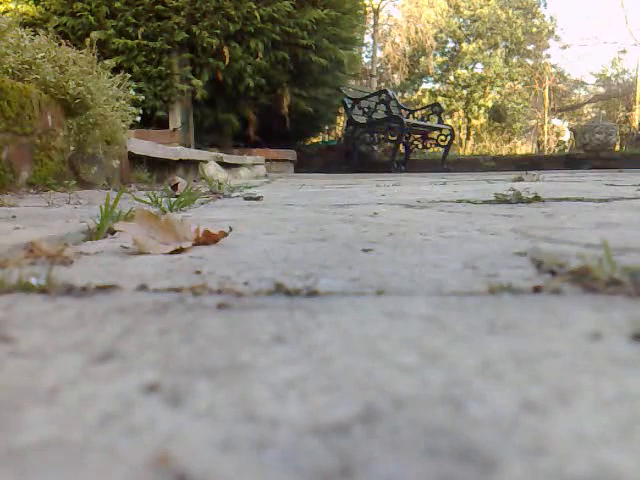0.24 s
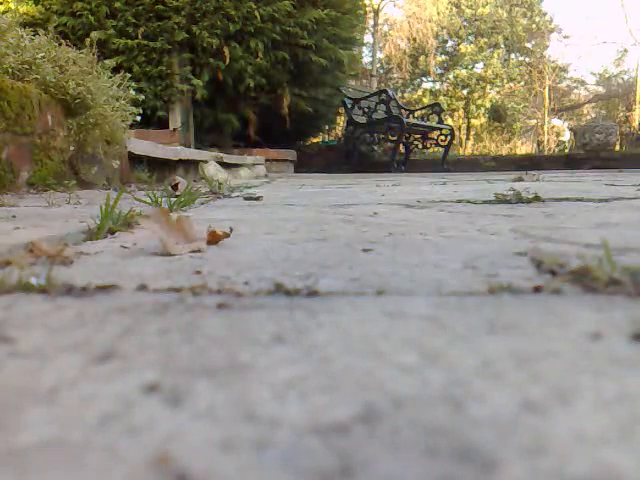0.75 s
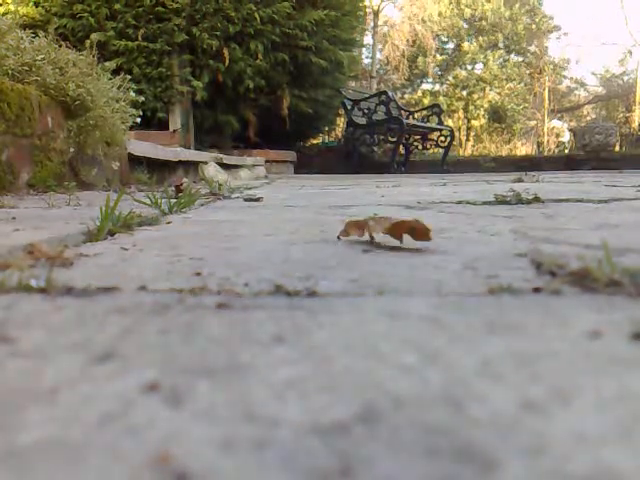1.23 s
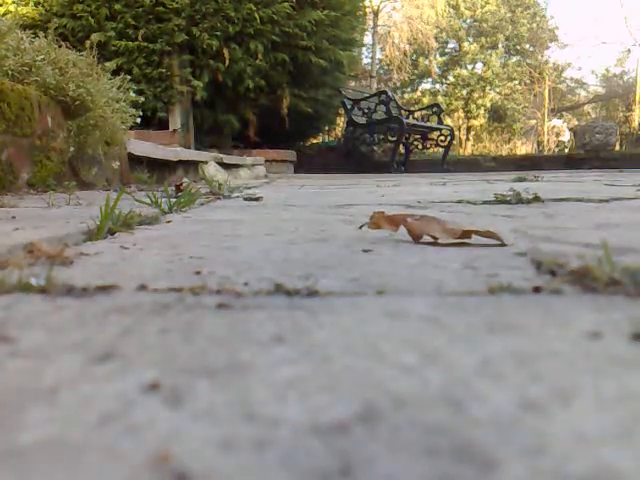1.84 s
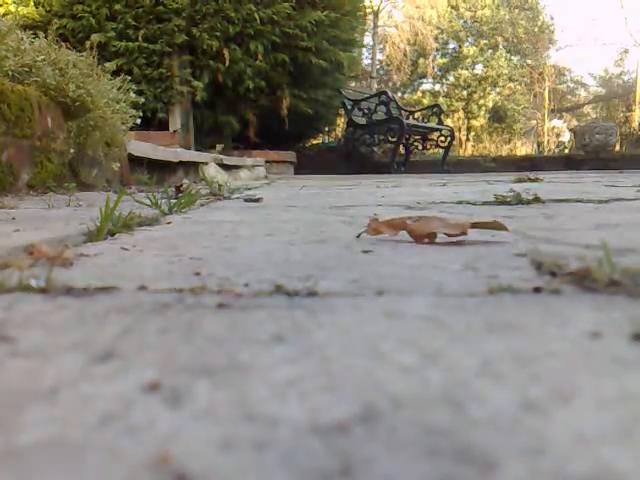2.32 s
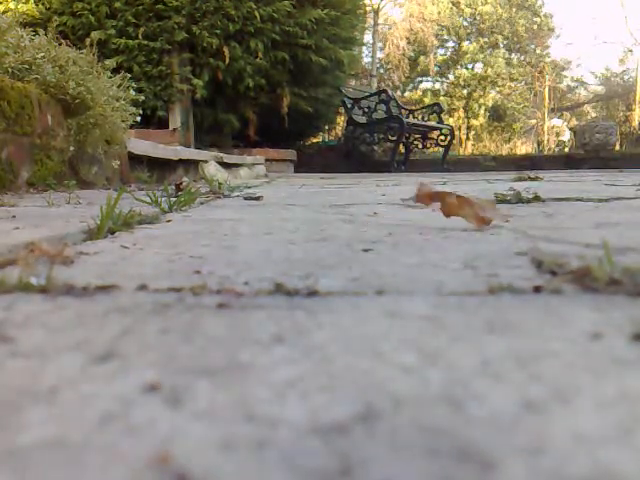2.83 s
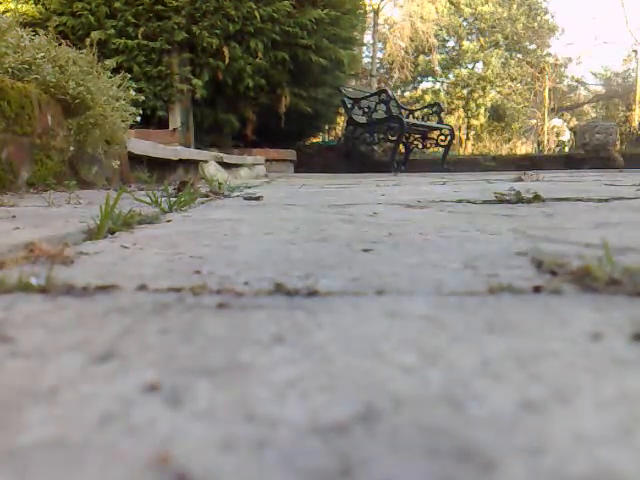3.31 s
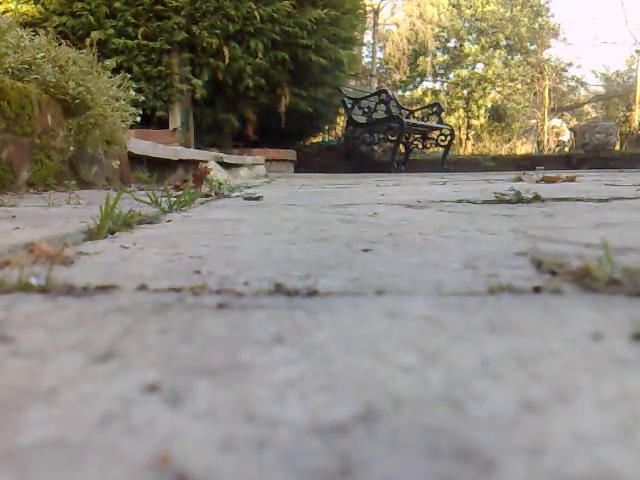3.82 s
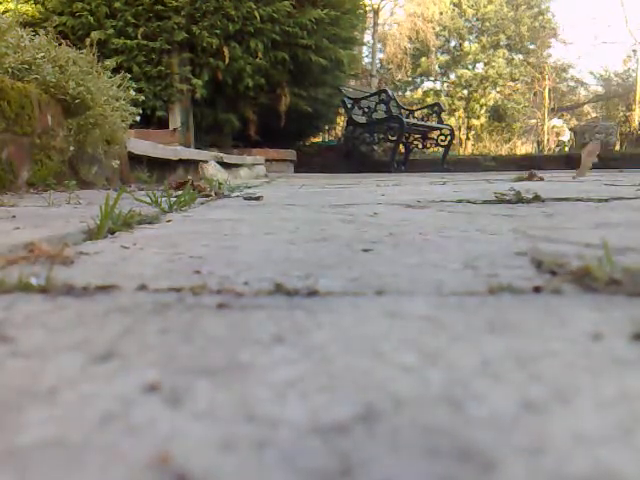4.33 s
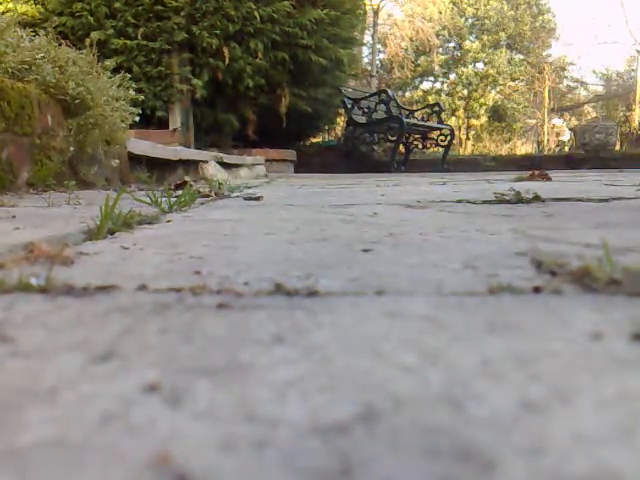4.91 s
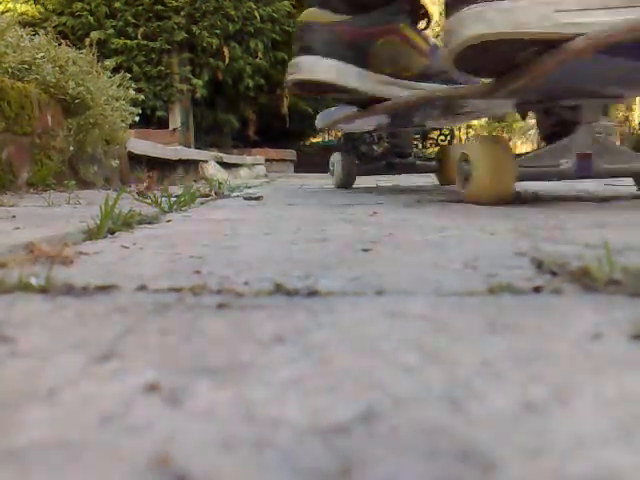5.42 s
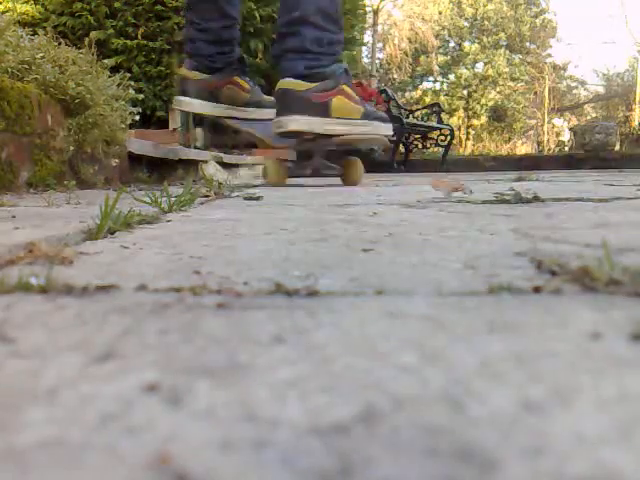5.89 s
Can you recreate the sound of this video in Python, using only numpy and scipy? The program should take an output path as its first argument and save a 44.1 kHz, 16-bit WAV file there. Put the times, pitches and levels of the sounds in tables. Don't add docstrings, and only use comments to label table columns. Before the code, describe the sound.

Skateboard clatters, scrapes and knocks on rough paving slabs, pauses, then rolls loudly past a ground-level microphone in a gusty, quiet garden.

```python
import sys
import numpy as np
from scipy import signal
from scipy.fft import rfft, irfft, next_fast_len
from scipy.io import wavfile
from scipy.ndimage import uniform_filter1d, map_coordinates

SR = 44100
rng = np.random.default_rng(int(sys.argv[2]) if len(sys.argv) > 2 else 0)


def unload_audio(sound):
    columns = np.transpose(np.atleast_2d(sound))
    steps = np.round(np.clip(columns, -1, 1) * 32767)
    wavfile.write(sys.argv[1], SR, steps.astype(np.int16))


def volts(x):
    e = np.asarray(x, float) / 20
    return 10 ** e


N = 271215


def unit(x):
    return x / np.sqrt(np.mean(x ** 2) + 1e-20)


def along(points, hz):
    f, v = np.transpose(points)
    return np.interp(np.log(hz + 1), np.log(f + 1), v)


def curves(rows):
    s, *cols = np.transpose(rows)
    return [np.interp(np.arange(N) / SR, s, c) for c in cols]


def wobble(rate_hz, span=slice(None)):
    knots = rng.standard_normal(int(N * rate_hz / SR) + 4)
    return map_coordinates(knots, [np.arange(N)[span] * rate_hz / SR])


def filtered(x, response):
    m = next_fast_len(N + SR // 2)
    return irfft(rfft(x, m) * response(np.fft.rfftfreq(m, 1 / SR)), m)[..., :N]


def body(modes, skirt):
    lo, hi = modes[0][0] / skirt, modes[-1][0] * skirt

    def raw(f):
        peaks = 0
        for k, (hz, width, db) in enumerate(modes):
            mode = 1j * f * width / (hz * hz - f * f + 1j * f * width)
            peaks = peaks + (-1) ** k * volts(db) * mode
        band = 1j * f / lo / (1 + 1j * f / lo) / (1 + 1j * f / hi)
        return peaks * band ** 2

    norm = np.sqrt(np.mean(abs(raw(np.linspace(0, SR / 2, 1 << 13))) ** 2))
    return lambda f: raw(f) / norm


# (frequency [Hz], density [dB per Hz])
GARDEN_SPECTRUM = [(15, -57), (25, 5.5), (87, -81), (123, 5), (149, -12.5), (3250, -28.5), (7500, -43.5),
                   (16000, -47)]


def garden():
    noise = filtered(rng.standard_normal(N), lambda hz: volts(along(GARDEN_SPECTRUM, hz)))
    return volts(-52.5) * volts(1.2 * wobble(6)) * unit(noise)


def glides(rows, width_hz, steady):
    out = np.zeros(N)
    for start_s, end_s, db, hz0, hz1 in rows:
        span = slice(round(start_s * SR), round(end_s * SR))
        way = np.linspace(0, 1, span.stop - span.start)
        phase = 2 * np.pi * np.cumsum(hz0 + (hz1 - hz0) * way) / SR
        tone = (steady + wobble(width_hz, span)) * np.sin(phase) + wobble(width_hz, span) * np.cos(phase)
        out[span] += volts(db) * np.sqrt(abs(np.sin(np.pi * way))) * tone
    return out


# (start [s], end [s], level [dB], first pitch [Hz], last pitch [Hz])
CHIRP_EVENTS = [
    (0.453, 0.853, -66.5, 3240, 3100),
    (3.874, 3.904, -58, 7250, 7200),
    (3.934, 3.958, -59.5, 7760, 7750),
]


def chirps():
    return glides(CHIRP_EVENTS, width_hz=63, steady=1.1)


# (frequency [Hz], t60 [s])
YARD_T60 = [(300, 0.27), (15000, 0.059)]


def yard(x):
    hz, t, z = signal.stft(rng.standard_normal(SR // 3), SR, nperseg=256)
    decay = volts(-60 * t / along(YARD_T60, hz)[:, None])
    tail = signal.istft(z * decay, SR, nperseg=256)[1]
    delay_samples = 300
    return signal.fftconvolve(np.pad(x, (delay_samples, 0)), tail / np.linalg.norm(tail))[:N]


# (frequency [Hz], density [dB per Hz])
BUFFET_SPECTRUM = [(12, -32.5), (50, -1), (90, -1.5), (140, -11), (220, -19), (600, -81)]
# (time [s], strength [dB])
BREEZE_STRENGTH = [(0, -43), (.53, -55.5), (1.37, -48), (1.63, -50), (1.92, -34.5), (2.05, -38),
                   (2.62, -26), (2.74, -45), (3.01, -56.5), (3.2, -36), (3.7, -37.5), (4.08, -50),
                   (4.28, -46), (4.61, -66), (4.75, -37), (5.0, -58.5), (5.25, -41), (6.15, -57)]
# (time [s], peak [dB], time to fall 20 dB [s]
PUFF_EVENTS = [(.01, -39, 0.3), (0.151, -21, 0.03), (.39, -32, 0.1), (1.414, -24, -0.02), (1.99, -38, 0.5),
               (2.09, -7, 0.0253), (2.229, -16, 0.01), (2.789, -24.5, 0), (3.218, -23, 0.15),
               (3.34, -21.5, 0.17), (3.902, -20.5, 0.2151), (4.18, -32.5, -0.06), (4.68, -43, 0.5),
               (5.121, -23.5, 0.25), (6.105, -26, -0.2)]


def wind():
    rise_over_fall, swirl_hz, swirl_gain = 0.6, 54.9, 0.49
    power, swirls = volts(curves(BREEZE_STRENGTH)[0]) ** 2, np.zeros(N)
    for s, db, fall_s in PUFF_EVENTS:
        near = slice(max(round((s - 2 * fall_s) * SR), 0), round((s + 2 * fall_s) * SR))
        t = np.arange(N)[near] / SR - s
        shape = volts(db - 20 * np.maximum(t, -t / rise_over_fall) / fall_s)
        power[near] += shape ** 2
        swirls[near] += shape * np.cos(2 * np.pi * swirl_hz * t)
    eddies = filtered(rng.standard_normal(N), lambda hz: volts(along(BUFFET_SPECTRUM, hz)))
    steady = eddies / abs(uniform_filter1d(eddies ** 2, size=SR // 12)) ** .35
    return np.sqrt(power) * unit(steady) + swirl_gain * swirls


# (start [s], end [s], level [dB], first pitch [Hz], last pitch [Hz])
SQUEAL_EVENTS = [
    (2.279, 2.303, -21, 1608, 1558),
    (2.567, 2.76, -33.5, 6710, 6600),
    (2.63, 2.69, -32.5, 3900, 3900),
    (2.885, 2.96, -38, 2400, 2700),
]


def squeals():
    return glides(SQUEAL_EVENTS, width_hz=570, steady=0)


# (time [s], slip rate [1/s], level [dB])
CREAK_SLIPS = [
    (1.665, 290, -45),
    (1.69, 418, -38),
    (1.76, 393, -38),
    (1.797, 375, -41.5),
    (1.821, 490, -35),
    (1.848, 360, -36),
    (1.88, 250, -42),
    (1.925, 350, -34.5),
    (1.985, 360, -42),
]
# (frequency [Hz], width [Hz], level [dB])
BUSHING_MODES = [(790, 700, -5.5), (1840, 410, 1.5), (2650, 750, -2.5), (3440, 410, 0), (4700, 1300, -14),
                 (6300, 1500, -19)]


def creak():
    rate_hz, level_db = curves(CREAK_SLIPS)
    t = np.arange(N) / SR
    grip = wobble(150)
    turns = np.cumsum(rate_hz * (1 + .03 * grip)) / SR
    slips = np.diff(np.floor(turns), prepend=0) * volts(1.3 * rng.standard_normal(N))
    drive = unit(slips) + .35 * rng.standard_normal(N)
    sounding = (t > CREAK_SLIPS[0][0]) & (t < CREAK_SLIPS[-1][0])
    return filtered(volts(level_db + 2 * grip) * sounding * drive, body(BUSHING_MODES, skirt=3.4))


# (start [s], end [s], level [dB], first centre [Hz], last centre [Hz])
SCUFF_EVENTS = [
    (2.468, 2.535, -25.5, 6500, 3980),
    (3.701, 3.727, -36.5, 6900, 8900),
    (3.815, 3.844, -47, 3500, 4500),
    (3.898, 3.916, -54, 4000, 4000),
    (4.041, 4.063, -40.5, 3920, 6900),
    (4.272, 4.292, -55, 4998, 6000),
    (4.319, 4.341, -51.5, 3920, 4970),
    (4.414, 4.425, -50, 6000, 6500),
    (5.017, 5.054, -13.5, 6700, 3250),
]
# (start [s], end [s], level [dB], first centre [Hz], last centre [Hz])
SWISH_EVENTS = [
    (2.877, 2.967, -35.5, 3600, 4170),
]


def scuffs():
    octaves, attack_s = 1, 0.00145
    hz, t, z = signal.stft(rng.standard_normal(N), SR, nperseg=128)
    gain = np.zeros(z.shape)
    for rows, swells in [(SCUFF_EVENTS, False), (SWISH_EVENTS, True)]:
        for s0, s1, db, hz0, hz1 in rows:
            centre_hz = np.interp(t, [s0, s1], [hz0, hz1])
            band = np.exp(-.5 * (np.log2((hz[:, None] + 1) / centre_hz) / octaves) ** 2)
            if swells:
                envelope = np.sin(np.pi * np.clip((t - s0) / (s1 - s0), 0, 1)) ** 2
            else:
                release_s = 0.11 * (s1 - s0)
                envelope = np.clip(np.minimum((t - s0) / attack_s, (s1 - t) / release_s), 0, 1)
            even = np.sqrt(np.mean(band ** 2) / np.mean(band ** 2, 0))
            gain += volts(db) * envelope * unit(band.T).T * even
    grain = volts(2 * wobble(120))
    return grain * signal.istft(z * gain, SR, nperseg=128)[1][:N]


def knocks(rows, trim_db, cycles):
    overtone_ratio, overtone_db = 1.796, -11
    t, out = np.arange(SR // 12) / SR, np.zeros(N + SR)
    for s, db, hz in rows:
        fade = np.exp(-2 * hz * t / cycles) * (1 - np.exp(-3 * hz * t))
        overtone_hz = min(overtone_ratio * hz, SR / 3)
        tone = np.sin(2 * np.pi * hz * t) + volts(overtone_db) * np.sin(2 * np.pi * overtone_hz * t)
        out[round(s * SR):][:len(t)] -= volts(db + trim_db) * fade / fade.max() * tone
    return out[:N]


# (time [s], peak [dB], note [Hz])
SPECK_EVENTS = [(.0074, -23, 11900), (.04, -24, 5500), (.0594, -25, 6000), (.1144, -32, 3740),
                (1.22, -19, 11000), (1.274, -24, 3820), (1.307, -21.5, 9000), (1.35, -8.5, 6900),
                (1.4336, -11, 10800), (1.5517, -15.5, 11400), (2.126, -8, 3930), (2.371, -18, 3520),
                (2.804, -15, 9300), (2.8274, -30.5, 4990), (2.9053, -20, 6010), (3.046, -10, 1544),
                (3.088, -25, 4480), (3.1034, -27, 8000), (3.1577, -31, 9000), (3.257, -22, 9000),
                (3.2854, -24, 10870), (3.2954, -23, 6420), (3.308, -15, 11600), (3.399, -14, 9000),
                (3.4441, -28, 11100), (3.8208, -34, 7210), (4.1729, -37, 5000), (5.016, -22, 4970)]


def specks():
    return knocks(SPECK_EVENTS, trim_db=1.5, cycles=1.5)


# (time [s], peak [dB], note [Hz])
RIDDEN_STONES = [(5.016, -13, 726), (5.042, -19, 610), (5.067, -23, 649), (5.104, -16, 755),
                 (5.112, -10, 720), (5.139, -5, 720), (5.157, -16, 576), (5.189, -22, 750),
                 (5.206, -16, 638), (5.216, -13, 700), (5.28, -14, 765), (5.299, -12, 726),
                 (5.328, -16, 600), (5.352, -21, 710), (5.379, -15, 730), (5.405, -11, 750),
                 (5.419, -7, 730), (5.696, -18, 550), (5.779, -19, 637), (5.824, -19, 790),
                 (5.886, -24, 555), (5.947, -21, 805), (5.972, -7, 784), (6.001, -23, 1210),
                 (6.03, -5, 540)]
# (time [s], peak [dB], note [Hz])
HIGHER_STONES = [(5.1246, -5, 1440), (5.4905, -15, 1430), (5.5066, -19, 1340), (5.5345, 1, 1770),
                 (5.5423, 0, 1300), (5.5575, -9.5, 1080), (5.5775, -7, 1244), (5.6056, -11.5, 1440),
                 (5.6143, -5, 1390), (5.6244, -6, 1280), (5.634, -14, 1260), (5.666, -12, 1350),
                 (5.7222, -8, 990), (5.7365, -14, 1360), (5.8653, -16.5, 1000), (5.886, -21, 1230),
                 (5.917, -9, 1220), (5.9436, -22, 1200), (5.9743, -24, 1370), (5.982, -21, 1124),
                 (5.9935, -20, 1400), (6.007, -22, 1220), (6.0166, -14, 1520), (6.0346, -14, 1420),
                 (6.0425, -10, 1500), (6.046, -10.5, 997), (6.0607, -17, 1320), (6.067, -14, 1790),
                 (2.203, -20, 1720), (2.217, -20, 1770), (1.424, -13, 1090), (.776, -33, 2900),
                 (5.552, -3, 2860)]
# (time [s], peak [dB], note [Hz])
PUSHED_STONES = [(0.024, -13, 400), (0.236, -27, 348), (0.312, -34, 302), (0.339, -24, 520),
                 (1.147, -33, 969), (1.169, -22.5, 626), (1.221, -12, 837), (1.275, -22, 900),
                 (1.305, -10, 1025), (1.314, -17, 764), (1.428, -9, 530), (1.507, -15, 520),
                 (1.608, -31, 595), (1.845, -23, 333), (2.113, -19, 720), (2.134, -16.5, 590),
                 (2.333, -13, 562), (2.341, -18, 344), (2.417, -12, 330), (2.475, -2.5, 716),
                 (2.494, -15, 410), (2.519, -7, 617), (2.574, -0.5, 630), (2.665, -15.5, 330),
                 (2.694, -13.5, 720), (2.753, -11.5, 600), (2.794, -7.5, 339), (3.215, -10.5, 356),
                 (3.3155, -5.5, 280), (3.284, -22, 630), (3.394, -21, 347), (4.393, -33, 304)]


def stone_knocks():
    return knocks(RIDDEN_STONES + HIGHER_STONES + PUSHED_STONES, trim_db=-3.5, cycles=3.4)


# (time [s], peak [dB], note [Hz])
DIP_EVENTS = [(.365, -22, 188), (.394, -8.5, 203), (1.407, -6, 154), (2.088, -16.5, 59.5),
              (2.216, -10, 129.7), (2.372, -2, 184), (2.386, -12, 183), (2.468, -4, 195), (2.492, -5, 191),
              (2.611, -5.5, 149), (3.204, -13, 88), (3.65, -20, 91), (5.232, -8, 121), (5.38, -12.5, 200),
              (5.404, -11, 220), (5.464, -11, 148), (5.531, -14, 170), (6.085, -14.5, 66),
              (6.115, -17, 90.3)]


def dips():
    return knocks(DIP_EVENTS, trim_db=-1.0, cycles=1.34)


# (frequency [Hz], width [Hz], level [dB])
DECK_LOW_MODES = [(131.5, 99, -7), (197.4, 62.6, 0.5), (324, 220, -3.5)]
# (frequency [Hz], width [Hz], level [dB])
DECK_MODES = [(530, 95, -2), (720, 111, -3), (953, 153, -4.5), (1354, 152, -4.5), (1715, 180, -4.5),
              (2193, 320, -11.5)]
# (frequency [Hz], width [Hz], level [dB])
AXLE_MODES = [(2390, 650, 7), (3900, 1070, 7), (4590, 1300, 5), (6500, 1800, -1.5)]
# (frequency [Hz], width [Hz], level [dB])
GRIT_MODES = [(7690, 5400, -30), (10800, 6550, 26), (13540, 3700, 21), (16400, 1500, -15)]


def parts():
    return [body(DECK_LOW_MODES, skirt=1.69), body(DECK_MODES, skirt=2.03),
            body(AXLE_MODES, skirt=5.5), body(GRIT_MODES, skirt=7.5)]


# (time [s], peak [dB])
NUDGED_SAND = [(.0024, -27), (0.0158, -22), (0.029, -7.5), (0.0793, -13), (.174, -26), (1.1833, -17.5),
               (1.2507, -15), (1.3708, -15), (1.411, -8), (1.4226, -3), (1.477, -9), (1.4856, -5),
               (1.506, -8), (1.527, -7), (1.54, -1.5), (1.56, -13.5), (1.5886, -21), (1.664, -15.5),
               (1.7291, -7.5), (2.0534, -12), (2.0976, -1), (2.175, -20), (2.189, -4), (2.2719, -4.5)]
# (time [s], peak [dB])
ROLLED_SAND = [(2.308, -12), (2.407, -8), (2.455, 1.5), (2.5685, -3.5), (2.6523, -1.14), (2.6777, 8),
               (2.721, -8), (3.0473, -20), (3.116, -6), (3.2728, -7.5), (3.3752, -14), (3.3896, -5),
               (3.479, -17), (3.6689, -16.5), (3.713, -18), (3.842, -25.5), (5.918, -12), (5.1473, 6.5),
               (5.1846, -10), (5.245, -4), (5.259, 1), (5.2778, -1), (5.362, 0.5), (6.113, -19)]
# (time [s], peak [dB], pitch [Hz])
PEBBLE_GRAINS = [
    (0.364, -31, 4440),
    (1.6811, -25, 4200),
    (3.2467, -10.5, 5800),
    (3.587, -13, 6200),
    (4.877, -25, 6950),
    (5.4037, -7, 4240),
]


def ticks():
    sand_hz, scatter = 11060, 0.073
    t, snaps, rings = np.arange(SR // 50) / SR, np.zeros(N + SR), np.zeros(N + SR)
    fade = volts(-60 * t / .006)
    sand = [(s, db, sand_hz * np.exp(scatter * rng.standard_normal())) for s, db in NUDGED_SAND + ROLLED_SAND]
    for s, db, hz in sand + PEBBLE_GRAINS:
        snaps[round(s * SR):][:len(t)] += volts(db - 10.5) * fade * rng.standard_normal(len(t))
        rings[round(s * SR):][:len(t)] += volts(db - 9) * fade * np.sin(2 * np.pi * hz * t)
    return filtered(snaps[:N], body(GRIT_MODES, skirt=1.2)) + rings[:N]


# (time [s], peak [dB], hardness [dB], t60 [s])
SLAM_EVENTS = [(.017, -19, -12, 0.126), (.081, -12.5, -22, 0.117), (.104, -18.5, -13, 0.036),
               (.14, -4, -28.5, 0.045), (.391, -6, -18.5, 0.09), (1.408, -12, -11.5, 0.056),
               (1.446, -11, -13, 0.036), (1.495, -15.5, -19, 0.097), (1.992, -8.5, -6, 0.052),
               (2.213, -21.5, -24, 0.061), (2.252, -17, -10.5, 0.19), (2.289, -6, -9.5, 0.042),
               (2.384, -7.5, -28.5, .017), (2.545, -6.5, -25, 0.02), (2.564, -8.5, -33, 0.097),
               (2.601, -24, 3, 0.04), (2.745, -15.5, -7.5, 0.15), (2.789, -8.5, -12, 0.069),
               (3.316, -4.5, -11, 0.08), (3.49, -15.5, -16, 0.07), (3.786, -32, -16, 0.078),
               (4.107, -0.3, -5, 0.053), (4.19, -12.5, -9.5, 0.0837), (4.675, -15, -9.5, 0.131),
               (5.091, -8, -12, 0.15), (5.135, -5, -13.5, 0.11), (5.231, -6, -7.5, 0.038),
               (5.535, 1, -16, 0.07)]
# (time [s], peak [dB], hardness [dB], t60 [s])
TAP_EVENTS = [(.049, -12, -17.5, 0.057), (4.691, -17.5, -6.5, 0.068), (1.115, -25, -37, 0.061),
              (1.212, -15, -21, 0.097), (1.231, -17.5, -13.5, 0.077), (1.295, -10.5, -16.5, 0.088),
              (1.462, -8, -29, 0.0148), (2.373, -11.5, -8, 0.024), (2.457, -13, -24, 0.27),
              (2.721, -14, -4.5, 0.091), (2.777, -1, -18.5, 0.079), (3.214, -6.5, -20, 0.074),
              (3.419, -9, -10.5, 0.044), (4.729, -29.5, -11.5, 0.2), (4.801, -30, -6.5, 0.053),
              (5.123, -1.5, -14.5, 0.06), (5.434, -2, -14, 0.026), (5.588, -7, -23, 0.1),
              (5.596, -5, -20, 0.079), (5.611, -13, -13, 0.21), (5.715, -10, -14.5, 0.11),
              (5.801, -23, -23, 0.063), (5.957, -13, -11, 0.078), (6.019, -9.5, -24, 0.19)]
# (time [s], peak [dB], hardness [dB], note [Hz])
CLACK_EVENTS = [(1.349, -2.5, -19.5, 1770), (1.788, -20, -28.5, 1790), (1.845, -22, -23, 2180),
                (2.076, -29, -5, 1300), (2.687, -8, -8, 1265), (3.045, -16.5, -3.5, 1540),
                (3.467, -21.5, -2, 1860), (3.511, -11, -5, 1371), (3.567, -23, -16, 1890),
                (3.614, -22, -9, 1438), (4.116, 0, -10.5, 1365), (4.666, -9.5, -5, 1367),
                (5.549, -4.5, -29, 2335), (5.653, -16, -32, 1270), (5.685, -8, -23, 1430),
                (5.909, -11.5, -23, 1250), (5.996, -8, -39, 1355), (2.127, -23, 0.5, 2440)]


def strikes():
    slam_hz, tap_hz, note_scatter, clack_t60_s = 691, 780, 0.0852, 0.054
    slam_thud_db, tap_thud_db, clack_thud_db = -5.5, -17.5, -19.5
    out = []
    for rows, thud_db, centre_hz in [(SLAM_EVENTS, slam_thud_db, slam_hz), (TAP_EVENTS, tap_thud_db, tap_hz)]:
        for s, db, hard_db, t60_s in rows:
            hz = centre_hz * np.exp(note_scatter * rng.standard_normal())
            out.append((s, db, db + thud_db, db + hard_db, hz, t60_s))
    for s, db, hard_db, hz in CLACK_EVENTS:
        out.append((s, db, db + clack_thud_db, db + hard_db, hz, clack_t60_s))
    return out


BLOW_RISE_S = [0.0019, 0.00071, 0.00038, 0.00016]


def blows():
    t = np.arange(SR // 6) / SR
    rise_s = np.array(BLOW_RISE_S)[:, None]
    drives, notes = np.zeros((len(rise_s), N + len(t))), np.zeros(N + len(t))
    lives, trims_db = np.array([[.6], [.9], [.8], [.7]]), np.array([-11.0, -13.5, -6.0, -3.5])
    push_gain, push_s = np.array([[-2.5], [-2.2], [1.5], [1.4]]), np.array([[.0012], [.0003], [.00006], [.00003]])
    push = push_gain * np.exp(-t / push_s)
    for s, knock_db, thud_db, crack_db, hz, t60_s in strikes():
        at = round(s * SR)
        rattle = volts(5.58 * uniform_filter1d(rng.standard_normal(len(t)), size=60) * np.sqrt(60))
        fade = volts(-60 * t / (lives * np.clip(t60_s, .012, .25))) * (1 - np.exp(-t / rise_s))
        thud_db, crack_db = min(thud_db, -9), min(crack_db, -8)
        level = volts(np.array([thud_db, knock_db, crack_db, crack_db]) + trims_db)[:, None]
        drives[:, at:][:, :len(t)] += level * (push + fade * rattle * rng.standard_normal(fade.shape))
        wander = 0.11 * np.cumsum(rng.standard_normal(len(t)))
        tone = np.sin(2 * np.pi * hz * t + wander - wander[0])
        notes[at:][:len(t)] += volts(knock_db - 7.5) * fade[1] * tone
    return drives[:, :N], notes[:N]


def texture(bumps, life_s, bed):
    shape = bed + unit(signal.lfilter([1], [1, -np.exp(-1 / (life_s * SR))], bumps))
    return unit(shape * rng.standard_normal(N))


def jolts(rows):
    out = np.zeros(N)
    for s, db, *_ in rows:
        out[round(s * SR)] = volts(db / 2 + 11.5)
    return out


def chips(stones, centre_hz, cycles):
    at = np.flatnonzero(stones)[:, None]
    hz = centre_hz * np.exp(0.389 * rng.standard_normal(at.shape))
    t = np.arange(SR // 40) / SR
    fade = np.exp(-hz * t / cycles) * (1 - np.exp(-hz * t))
    notes = stones[at] * fade * np.sin(2 * np.pi * hz * t)
    return unit(np.bincount((at + np.arange(len(t))).ravel(), notes.ravel(), N + len(t))[:N])


# (time [s], contact [dB], grit [dB re contact], deck load [dB re contact])
SET_DOWN_PASS = [(0, -34.5, -17.5, 15.5), (.036, -34.5, -12, 11.5), (.13, -35.5, -21, 10),
                 (.254, -48, -25, 3), (.346, -40.5, -20, 7.5), (.448, -53, -17, 18), (.56, -54, -22, 0.5),
                 (.906, -52.5, -19, 8), (1.09, -47, -12, 6)]
# (time [s], contact [dB], grit [dB re contact], deck load [dB re contact])
NUDGE_PASS = [(1.1, -45, -20, 5), (1.21, -35, -11, 6.5), (1.328, -34.5, -9.5, 4), (1.396, -38.5, -10.5, 14),
              (1.514, -35.5, -9.5, 9.5), (1.676, -46, -15.5, 6.5), (1.838, -33, -26, -6.5),
              (1.99, -40.5, -13, -1.5)]
# (time [s], contact [dB], grit [dB re contact], deck load [dB re contact])
DRAG_PASS = [(2.0, -52, -2, 20), (2.062, -40, -9, 8), (2.2, -34, -8, 16.5), (2.27, -34, -5, 17),
             (2.426, -33.5, -5.5, 18.5), (2.615, -27.5, -3, 13.5), (2.645, -27.5, -2.5, 4),
             (2.682, -31, -6.5, 3), (2.82, -33, -12, -20)]
# (time [s], contact [dB], grit [dB re contact], deck load [dB re contact])
LIFT_PASS = [
    (2.83, -39.5, -16.5, -7.5),
    (2.912, -39.5, -17.5, -13),
    (3.04, -68, -34, 17),
]
# (time [s], contact [dB], grit [dB re contact], deck load [dB re contact])
SHUFFLE_PASS = [(3.051, -31.5, -20, -5), (3.181, -49.5, -18, 11), (3.268, -38.5, -17.5, 8),
                (3.386, -31, -17, 1), (3.462, -36.5, -23, 5), (3.558, -36.5, -31, -1), (3.62, -45, -15, -5),
                (3.85, -59, -4, 22.5), (4.1, -47.5, -19.5, -3)]
# (time [s], contact [dB], grit [dB re contact], deck load [dB re contact])
STEP_ON_PASS = [
    (4.13, -45, 0, 15),
    (4.29, -77, -9, 15.4),
    (4.6, -50, -8, 1.2),
    (4.82, -52, -18, 5.7),
    (5.012, -47, -9, 3.9),
]
# (time [s], contact [dB], grit [dB re contact], deck load [dB re contact])
RIDE_PASS = [(5.04, -22.5, -7, 0.55), (5.074, -32.5, 0.5, 16.3), (5.19, -37, -4, 25.2),
             (5.25, -25, -8.5, 20), (5.277, -33.5, -12, 15), (5.36, -32.5, -14, 17),
             (5.45, -31.5, -10.5, 11.5), (5.525, -26.5, -16.5, 13), (5.568, -24.5, -15, 3.4),
             (5.63, -25.5, -22, 3.4), (5.66, -37.5, -14, 7.9), (5.701, -29.5, -19, 9),
                  (5.77, -35, -27, 7.5), (5.83, -29.5, -23.5, 9.4), (5.93, -28.5, -19, 4.1),
                  (5.98, -25.5, -20.5, 2.1), (6.05, -29, -13.5, 6), (6.15, -35, -10.5, 17)]


def rolling():
    contact_db, grit_db, load_db = curves(SET_DOWN_PASS + NUDGE_PASS + DRAG_PASS + LIFT_PASS + SHUFFLE_PASS
                                          + STEP_ON_PASS + RIDE_PASS)
    axle_db = -15 + 0.68 * contact_db + 0.44 * grit_db
    levels_db = [contact_db + load_db, contact_db, axle_db, contact_db + grit_db]
    stones_per_s = 200 * np.clip((levels_db[-1] + 62.5) / 22, .3, 1)
    sizes = volts(2.0 * np.minimum(rng.exponential(size=N), 3))
    firm = np.clip((contact_db + 56) / 12, 0, 1)
    stones = firm * (rng.random(N) < stones_per_s / SR) * sizes
    coarse = stones / 2 + jolts(RIDDEN_STONES + HIGHER_STONES + PUSHED_STONES)
    fine = coarse + jolts(NUDGED_SAND + ROLLED_SAND + SPECK_EVENTS)
    textures = [texture(coarse, life_s=0.011, bed=2.3), texture(coarse, life_s=0.0057, bed=0.76),
                texture(coarse, life_s=0.0027, bed=1.0), texture(fine, life_s=0.0035, bed=0.75)]
    shared = firm * wobble(22)
    lumps_db, trims_db = [1.85, 1.0, 0.77, 2.6], [-6.0, -2.5, 1.0, 3.3]
    drives = []
    for db, rough, lump_db, trim_db in zip(levels_db, textures, lumps_db, trims_db):
        drives.append(volts(db + trim_db + lump_db * shared) * rough)
    return np.array(drives), volts(contact_db - 3.5) * chips(stones, centre_hz=959.0, cycles=2.7)


# (frequency [Hz], width [Hz], level [dB])
LOADED_MODES = [(112, 29, 1), (175, 69.3, -0.5), (244, 127, -3), (713, 390, -11)]


def ring(drives):
    rider_s = 4.95
    ridden = np.arange(N) > rider_s * SR
    out = filtered(drives[0] * ridden, body(LOADED_MODES, skirt=0.68))
    for drive, part in zip([drives[0] * ~ridden, *drives[1:]], parts()):
        out = out + filtered(drive, part)
    return out


def scene():
    (shaken, chipped), (struck, notes) = rolling(), blows()
    single = stone_knocks() + dips() + specks()
    board = ring(shaken + struck) + chipped + notes + ticks() + scuffs() + creak() + single
    echo = volts(-23) * yard(board)
    return (board + echo + squeals() + chirps() + wind() + garden())[None]


def low_pass(x):
    return signal.sosfilt(signal.butter(12, 16990, fs=SR, output="sos"), x)


def record(dry):
    top_hz, edge_hz, fall_db = 15750, 600, -40
    limited = dry / (1 + abs(dry / .7) ** 4) ** (1 / 4)
    mix = filtered(limited, lambda hz: volts(fall_db * np.clip((hz - top_hz) / edge_hz, 0, 1)))
    return low_pass(mix)


dry = scene()
out = record(dry)
unload_audio(out)
```